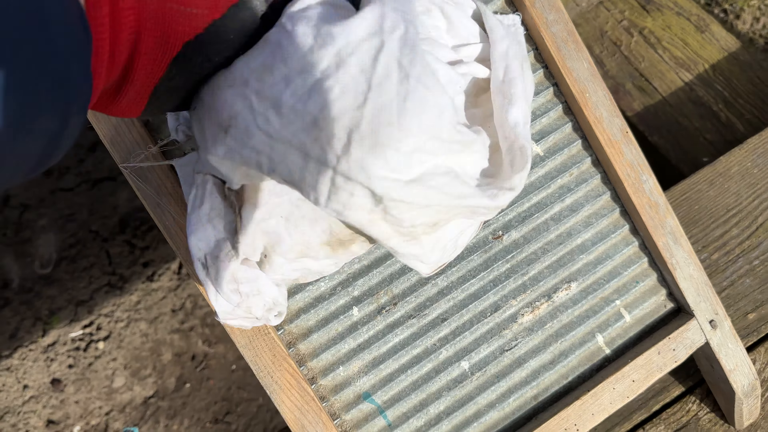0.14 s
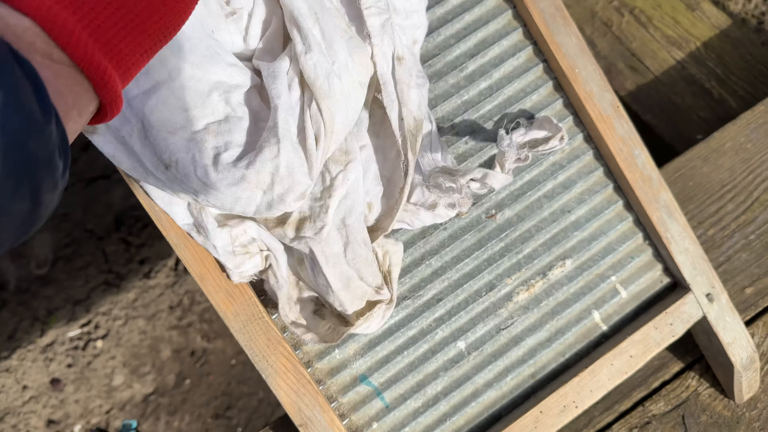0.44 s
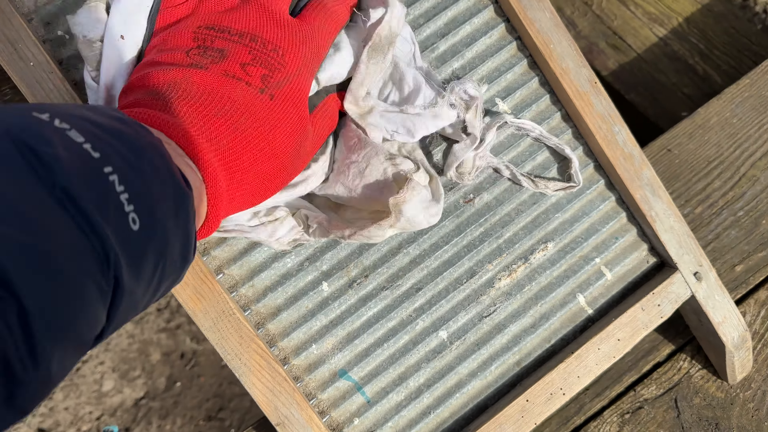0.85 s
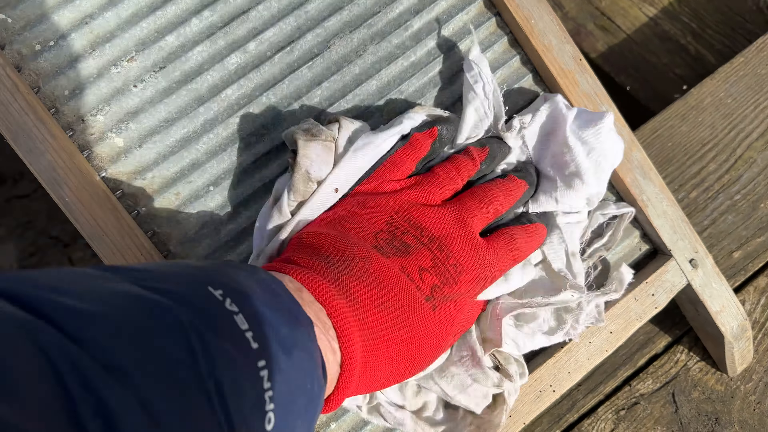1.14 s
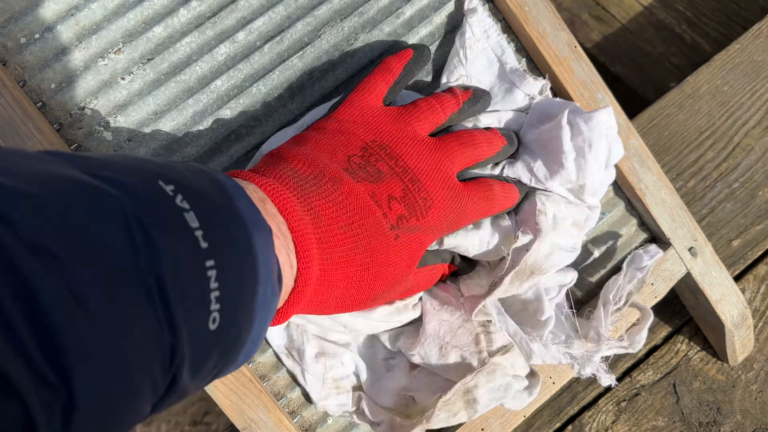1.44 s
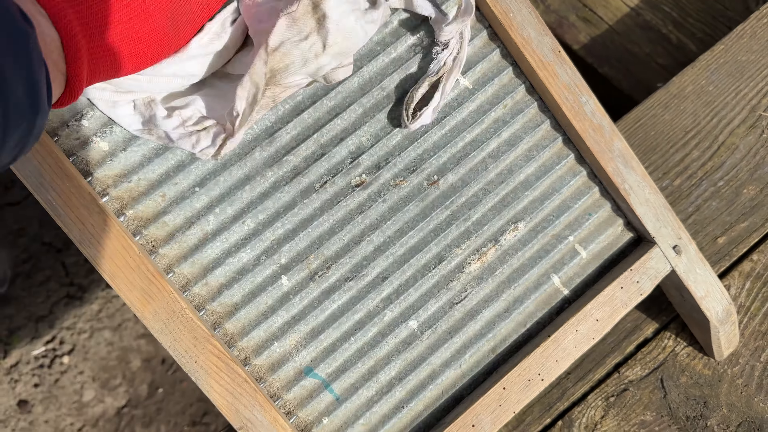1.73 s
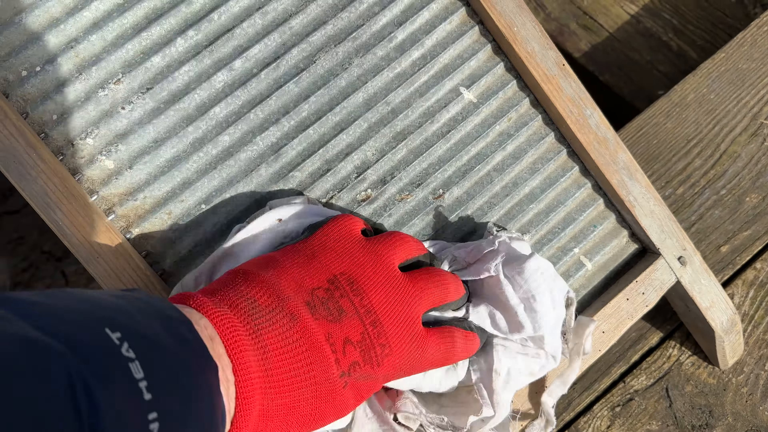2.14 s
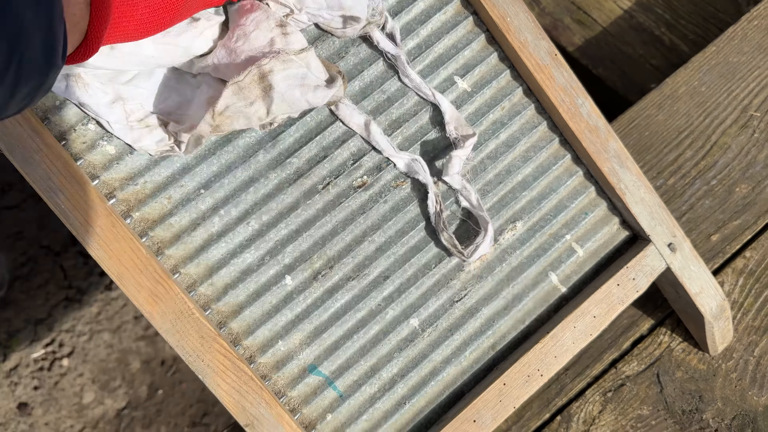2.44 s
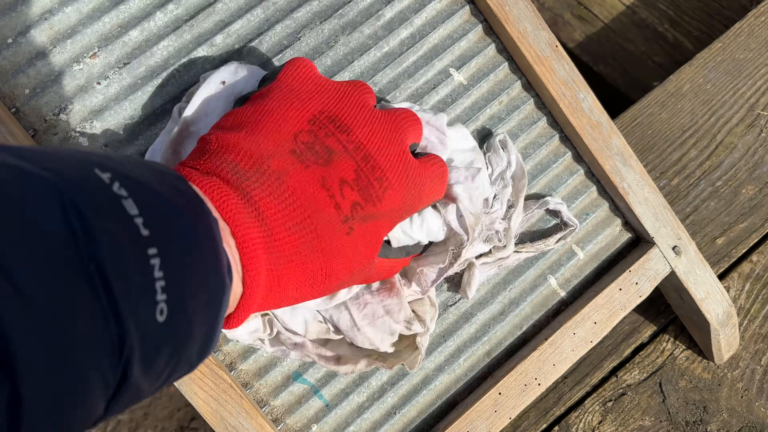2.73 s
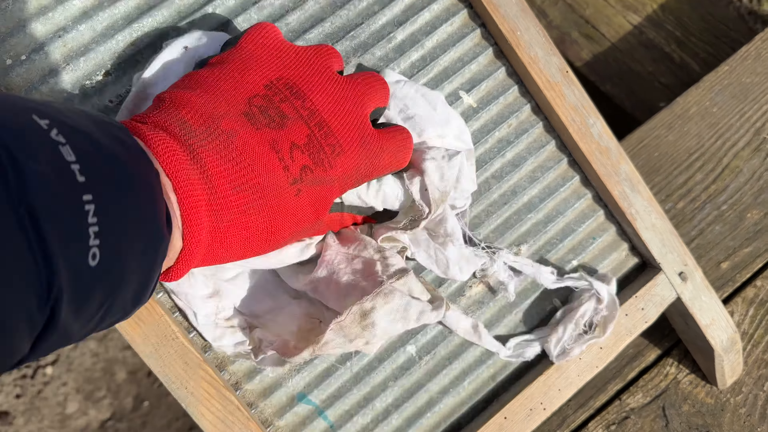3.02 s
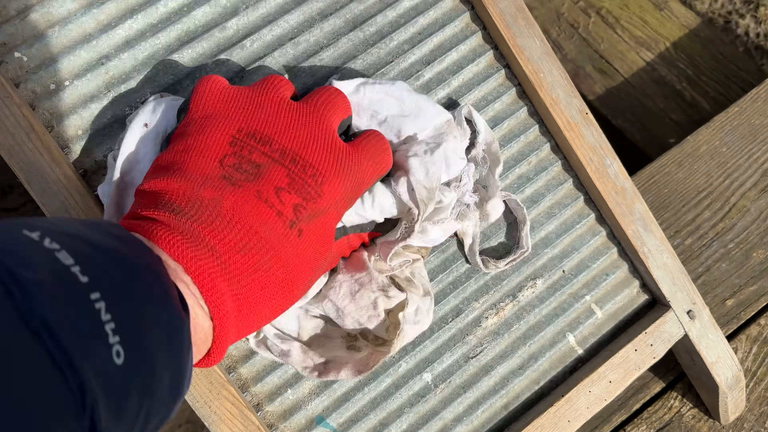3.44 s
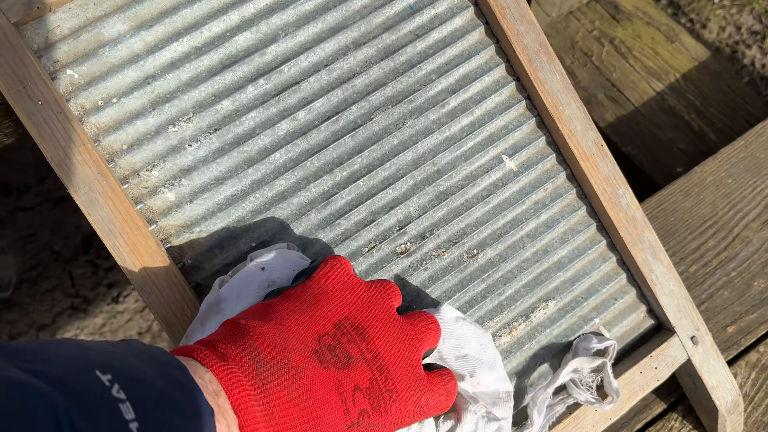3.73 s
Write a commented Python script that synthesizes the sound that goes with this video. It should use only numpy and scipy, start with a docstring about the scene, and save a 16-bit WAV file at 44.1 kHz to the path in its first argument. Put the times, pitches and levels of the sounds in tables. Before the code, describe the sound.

Wet fabric rubs a ribbed metal board in a wooden frame: first a rattling landing, then one slow stroke and six quicker ones with hollow drumming and knocks, close and dry in quiet open air.

```python
"""Close by, outdoors, with no echo: a wet cloth lands on a corrugated metal washboard in a wooden frame.
The board clatters; a hand then scrubs the cloth down and up in seven strokes.
The fabric is noise that hisses with the hand's speed; slips over the ribs tick and some folds rasp.
Under pressure the slips drum the sheet and boom in the frame's modes, with knocks, thumps and wet slaps.
Quiet air noise lies behind."""
import sys
import numpy as np
from scipy import signal
from scipy.fft import rfft, irfft
from scipy.io import wavfile
from scipy.ndimage import uniform_filter1d

SR = 44100
rng = np.random.default_rng(int(sys.argv[2]) if len(sys.argv) > 2 else 0)


def generate_wav(signal):
    """Clip the signal to [-1, 1] and save it as 16-bit WAV at the path in sys.argv[1]."""
    frames = np.transpose(np.atleast_2d(signal))
    scaled = np.clip(frames, -1, 1) * 32767
    pcm = np.round(scaled).astype(np.int16)
    wavfile.write(sys.argv[1], SR, pcm)


N = 169785


def undb(db):
    """Level: decibels to amplitude gain."""
    return 10 ** (np.asarray(db) / 20)


def unit(x):
    """Normalisation: scale to rms 1."""
    return x / np.sqrt(np.mean(x ** 2))


def noise(size=N):
    """White noise: equal mean power at every frequency."""
    return rng.standard_normal(size)


def through(x, response):
    """Convolution: pass a signal through an impulse response."""
    return signal.fftconvolve(x, response)[:len(x)]


def energy_one(h):
    """Normalisation: scale a response to unit energy."""
    return h / np.sqrt(np.sum(h ** 2))


def colour(x, points, size=4096):
    """Minimum-phase filtering: a causal response of given spectrum; white noise keeps its level."""
    hz, db = np.array(points).T
    freq = np.maximum(np.arange(size // 2 + 1) * SR / size, 1)
    magnitude = undb(np.interp(np.log(freq), np.log(hz), db))
    cepstrum = irfft(np.log(magnitude))
    # folding the cepstrum onto positive time makes the filter causal
    cepstrum[1:size // 2] *= 2
    cepstrum[size // 2 + 1:] = 0
    return through(x, energy_one(irfft(np.exp(rfft(cepstrum)))))


def ring(modes, t, left=1):
    """Modal superposition: decaying sines of alternating sign; damping leaves a share of each t60."""
    total = np.zeros(len(t))
    for k, (hz, db, t60) in enumerate(modes):
        decay = np.exp(-np.log(1000) * t / (t60 * left))
        total += (-1) ** k * undb(db) * np.sin(2 * np.pi * hz * t) * decay
    return energy_one(total)


def add(out, start, sound):
    """Superposition: mix a sound in at a time."""
    i = max(int(start * SR), 0)
    out[i:i + len(sound)] += sound[:N - i]


# spectrum of the fabric's hiss: (f/Hz, relative level/dB per Hz)
FABRIC_SPECTRUM = [(100, 9.5), (500, -2), (1500, 3), (3000, 1.5), (5000, 1), (7500, -1.5), (9800, 1.5),
                   (11200, -11.5), (13500, -3.5), (16000, -3)]
# spectrum of the ticks over the ribs: (f/Hz, relative level/dB per Hz)
TICK_SPECTRUM = [(100, -11), (400, 8.5), (900, 1.5), (2300, 1), (4000, -1), (12000, -29.5)]
# spectrum of the sheet as the slips drum it: (f/Hz, relative level/dB per Hz)
DRUM_SPECTRUM = [(150, -19), (280, -6), (420, -4.5), (700, 3.5), (1100, 3.5), (1400, -9), (1800, -10.5),
                 (3800, -17), (7000, -69)]
TICK_PULSING, DRUM_PULSING = 0.68, 0.22  # share of the rubbing that comes in bursts
FABRIC_DB, TICKS_DB, SHEET_DB, BOOM_DB = 4, -6, -2.5, -3


def scrubbing(t, fibre_db=2.0, hand_left=0.35, ring_db=-3, uneven_db=3.0):
    """Friction excitation: fibres hiss, ribs tick, folds rasp; slips shake the damped sheet and the frame."""
    pace, rate, hiss, tick = motion(t)
    on_sheet, on_frame = pressure(t, pace)
    slips = rib_slips(t, rate)
    short = t[:SR // 2]

    fibres = unit(noise() * undb(fibre_db * noise()))  # uneven grain
    fabric = undb(FABRIC_DB) * colour(fibres * hiss, FABRIC_SPECTRUM)
    ticks = undb(TICKS_DB) * colour(rubbing(slips, TICK_PULSING) * tick, TICK_SPECTRUM)

    ringing = through(rubbing(slips, DRUM_PULSING), sheet(short, hand_left))
    shaken = unit(rubbing(slips, DRUM_PULSING) + undb(ring_db) * ringing)
    drum = undb(SHEET_DB) * unit(colour(shaken, DRUM_SPECTRUM)) * on_sheet

    boom = undb(BOOM_DB) * frame_boom(slips, short) * on_frame
    folds = rasps(t, rubbing(slips, DRUM_PULSING))
    return uneven(fabric + ticks, uneven_db) + drum + folds + boom


# strokes of the hand, down and up in turn; levels are before the layer gains:
# (start t/s, fastest t/s, end t/s, top speed/ribs per s, hiss level/dB, tick level/dB)
STROKES = [(0.758, 1.18, 1.308, 50.5, -49, -56), (1.351, 1.5, 1.728, 80.5, -47.5, -70),
           (1.725, 1.978, 2.212, 86.4, -48, -47), (2.164, 2.253, 2.515, 78.7, -48.5, -45.5),
           (2.554, 2.713, 2.895, 79.3, -47, -45.5), (2.936, 3.028, 3.277, 80, -47, -44.5),
           (3.27, 3.501, 3.624, 71.7, -46.5, -39.5)]
HISS_LAW, TICK_LAW = 0.82, 1  # strength as a power of speed
STOP_LAW = 0.75  # below 1 the hand keeps its speed longer and stops more abruptly


def motion(t):
    """Kinematics: each stroke speeds up and slows; gives speed 0-1, ribs per s, hiss and tick strength."""
    pace, rate, hiss, tick = np.zeros((4, N))
    for start, fastest, end, top, hiss_db, tick_db in STROKES:
        speed = np.sin(np.pi / 2 * np.interp(t, [start, fastest, end], [0, 1, 0]))
        speed = np.where(t > fastest, speed ** STOP_LAW, speed)
        pace = np.maximum(pace, speed)
        rate = np.maximum(rate, top * speed)
        hiss = np.hypot(hiss, undb(hiss_db) * speed ** HISS_LAW)
        tick = np.hypot(tick, undb(tick_db) * speed ** TICK_LAW)
    return pace, rate, hiss, tick


RIB_SLIP_S, RIB_JITTER, RIB_SCATTER_DB = 0.00069, 0.065, 4  # burst decay, jitter in ribs, size spread


def rib_slips(t, rate, count=400):
    """Stick-slip: the cloth catches on each rib and slips off it in a short, uneven burst."""
    late, size = rng.standard_normal((count, 2)).T
    ribs_passed = np.cumsum(rate) / SR
    at = np.searchsorted(ribs_passed, np.arange(1, count + 1) + RIB_JITTER * late)
    reached = at < N
    hits = np.zeros(N)
    hits[at[reached]] = undb(RIB_SCATTER_DB * np.clip(size, -2, 2))[reached]
    return unit(through(hits, np.exp(-t[:SR // 10] / RIB_SLIP_S)))


def rubbing(slips, pulsing):
    """Amplitude modulation: friction noise, partly steady and partly in bursts at the ribs."""
    return unit(noise() * (1 - pulsing + pulsing * slips))


# the hand leans on the board once or twice in a stroke; levels are before the layer gains:
# (centre t/s, half length t/s, sheet level/dB, frame boom level/dB)
LEANS = [(1.204, 0.11, -61, -43), (1.607, 0.048, -31.5, -34), (2.032, 0.04, -50, -40),
         (2.294, 0.022, -45, -40.5), (2.434, 0.04, -33, -34.5), (2.686, 0.026, -28.5, -30),
         (2.802, 0.036, -52, -40), (3.114, 0.045, -34.5, -36.5), (3.488, 0.045, -33, -30.5)]
GLIDE_SHEET_DB, GLIDE_BOOM_DB = -50.5, -52.5  # light contact all through a stroke, before layer gains
BOOM_LAG_S, BOOM_SPREAD = 0.0026, 1.14  # the frame answers later and longer than the sheet


def swell(u):
    """Smooth pulse: a hyperbolic secant that rises and falls alike."""
    return 1 / np.cosh(np.clip(u, -20, 20))


def pressure(t, pace):
    """Contact force: sheet and frame are driven by light contact and a swell wherever the hand leans."""
    on_sheet = undb(GLIDE_SHEET_DB) * pace
    on_frame = undb(GLIDE_BOOM_DB) * np.sqrt(pace)
    for when, half, sheet_db, boom_db in LEANS:
        sheet_swell = swell((t - when) / half)
        frame_swell = swell((t - when - BOOM_LAG_S) / (half * BOOM_SPREAD))
        on_sheet = np.hypot(on_sheet, undb(sheet_db) * sheet_swell * np.sqrt(pace))
        on_frame = np.hypot(on_frame, undb(boom_db) * frame_swell)
    return on_sheet, on_frame


def uneven(x, depth_db, size=1024, count=3):
    """Time-varying filtering: random gains, smoothed over pitch and time, make the hiss and ticks uneven."""
    spectra = signal.stft(x, nperseg=size)[2]
    over_pitch = uniform_filter1d(noise(spectra.shape), count, axis=0)
    smoothed = unit(uniform_filter1d(over_pitch, count, axis=1))
    gains = unit(undb(depth_db * smoothed))
    return signal.istft(spectra * gains, nperseg=size)[1][:N]


# taut folds that rasp over the ribs: (start t/s, end t/s, level/dB, first f/Hz, last f/Hz)
RASPS = [(0.802, .855, -54, 2500, 2600), (1.072, 1.305, -49.5, 850, 1296), (1.746, 1.87, -53.5, 3180, 2600),
         (1.981, 2.136, -51, 2383, 2193), (2.78, 2.888, -49, 992, 1326), (2.985, 3.089, -47.5, 2230, 1870),
         (3.609, 3.651, -46.5, 2050, 1570)]


def rasps(t, grain, width_hz=330):
    """Gliding resonance: a fold rasps in a narrow band that moves as it tightens or slackens."""
    out = np.zeros(N)
    narrow = signal.butter(2, width_hz, fs=SR, output="sos")
    for start, end, db, first_hz, last_hz in RASPS:
        along = np.interp(t, [start, end], [0, 1])
        centre_hz = first_hz + (last_hz - first_hz) * along
        turn = np.exp(2j * np.pi * np.cumsum(centre_hz) / SR)
        # shift the band to zero, low-pass it and shift it back
        band = unit((signal.sosfilt(narrow, grain / turn) * turn).real)
        out += undb(db) * np.sqrt(np.sin(np.pi * along)) * band
    return out


# modes of the metal sheet, undamped by the hand: (f/Hz, relative level/dB, t60 t/s)
SHEET_MODES = [(337, 2, 0.14), (381, 5, 0.18), (457, 1.5, 0.15), (503, -1, 0.31), (569, 3, 0.23),
               (609, -2, 0.32), (645, -0.5, 0.31), (745, 2.5, 0.14), (926, -3, 0.19), (1101, -5, 0.16),
               (1200, -8, 0.25), (1325, -4.5, 0.083), (1677, 3, 0.19), (1810, 2.5, 0.11), (2640, 6, 0.07),
               (2860, 0.5, 0.11), (3370, -4.5, 0.15), (3735, 3, 0.21)]


def sheet(t, left, dense_t60_s=0.49, modes_db=-2, crack_db=-3, crack_s=0.0014):
    """Impulse response: the sheet answers with a crack, its main modes and a dense wash of lesser ones."""
    dense = energy_one(noise(len(t)) * np.exp(-np.log(1000) * t / (dense_t60_s * left)))
    crack = energy_one(noise(len(t)) * np.exp(-t / crack_s))
    modes = ring(SHEET_MODES, t, left)
    return energy_one(dense + undb(crack_db) * crack + undb(modes_db) * modes)


# modes of the frame, undamped by the hand: (f/Hz, relative level/dB, t60 t/s)
FRAME_MODES = [(65.5, -1.5, 0.092), (128.5, 1, 0.11), (166, 0, 0.064), (193.2, 0, 0.08), (265, -9, 0.037)]


def frame_boom(slips, short, rumble_db=-2):
    """Forced resonance: the rib slips and a steady rumble drive the frame's modes."""
    response = ring(FRAME_MODES, short)
    slipping = unit(through(slips - np.mean(slips), response))
    rumble = unit(through(noise(), response))
    return unit(slipping + undb(rumble_db) * rumble)


# sharp knocks of the board, from landing or from a hard catch of the cloth:
# (t/s, relative level/dB, contact time t/s, ring left by the hand 0-1)
KNOCKS = [(0.233, -36.5, 0.0018, 1), (0.3029, -22.5, 0.00059, 0.27), (0.309, -33, 0.000025, 0.46),
          (.319, -23.5, 0.00039, 0.08), (.325, -26, 0.000039, 0.37), (.331, -24, 0.000077, 0.39),
          (.349, -28.5, 0.00011, 0.28), (.36, -30, 0.00042, 0.75), (.541, -48.5, 0.00011, 1),
          (1.555, -34, 0.000036, 0.72), (1.62, -41, 0.00023, 0), (1.96, -40, 0.00029, 0.2),
          (2.37, -29.5, 0.00015, 0.28), (2.638, -31, 0.00022, 0.22), (2.654, -29, 0.00012, 0.34),
          (2.671, -28, 0.0001, 0.6), (2.684, -31.5, 0.000097, 0.35), (2.938, -49, 0.00011, 0.08),
          (2.992, -39, 0.00012, 0.12), (3.023, -42, 0.000089, 0.3), (3.462, -31, 0.00006, 0.6),
          (3.477, -32.5, 0.000069, 0.19), (3.49, -31.5, 0.000046, 0.32)]
# spectrum of the clang: (f/Hz, relative level/dB per Hz)
CLANG_SPECTRUM = [(130, -5), (340, 0), (480, -1), (900, 8.5), (1750, 9.5), (2150, 10), (2800, 10),
                  (3800, 11), (6000, 9), (9500, 7.5), (11500, -1), (16000, 7)]


def knocks(t, knock_db=26):
    """Impact excitation: the board is jolted; longer, softer contact gives a duller clang."""
    out, short = np.zeros(N), t[:SR // 2]
    for start, db, contact, left in KNOCKS:
        answer = colour(sheet(short, max(left, 0.05)), CLANG_SPECTRUM)
        push = short * np.exp(-short / contact)
        add(out, start, undb(db + knock_db) * energy_one(through(answer, push)))
    return out


# soft blows of the hand and the bundle: (t/s, relative level/dB, push length t/s)
THUMPS = [(0.2, -39, 0.0088), (.230, -33, 0.0047), (0.247, -26, 0.00074), (.260, -31, 0.0027),
          (0.283, -34.5, 0.00071), (0.649, -46.5, 0.012), (.833, -42, 0.0054), (1.273, -40.5, 0.0058),
          (1.354, -39.5, 0.0066), (1.434, -29, 0.00045), (1.453, -33.5, 0.0027), (2.37, -34, 0.00077),
          (2.945, -40, 0.01), (3.646, -35, 0.0069), (3.667, -36, 0.0058), (3.735, -34, 0.0034)]


def thumps(t, thump_db=27, left=0.49):
    """Low-pass impact: padded half-sine blows move only the frame."""
    out, short = np.zeros(N), t[:SR // 2]
    for start, db, length in THUMPS:
        push = np.sin(np.pi * np.minimum(short / length, 1))
        boom = through(ring(FRAME_MODES, short, left), push)
        add(out, start, undb(db + thump_db) * energy_one(boom))
    return out


# wet slaps, slides and snaps of the fabric:
# (start t/s, relative level/dB, rise t/s, decay t/s, dull above f/Hz)
SLAPS = [(0, -47, 0.11, 0.06, 18000), (.17, -50, 0.15, 0.022, 12000), (0.324, -39.5, 0.0014, 0.017, 18000),
         (.68, -52.5, 0.071, 0.022, 12000), (0.817, -42, 0.0043, 0.022, 7360),
         (1.7375, -33.5, 0.00064, 0.02, 9900), (1.77, -39.5, 0.015, 0.036, 6000),
         (1.845, -33, 0.00059, 0.0019, 7050), (3.583, -28.5, 0.00065, 0.0081, 4400),
         (3.614, -34.5, 0.027, 0.0063, 2590), (3.72, -55, .06, 0.043, 10800)]
# spectrum shared by the slaps: (f/Hz, relative level/dB per Hz)
SLAP_SPECTRUM = [(200, 0.5), (1500, -8), (2800, -3), (5000, -5), (9500, -3), (11500, -12), (16000, -7.5)]


def slaps(t, crackle_db=3):
    """Transient noise: folds of wet fabric land, slide or snap on the metal in crackling bursts."""
    out = np.zeros(N)
    for start, db, rise, decay, dull_hz in SLAPS:
        attack = np.clip((t - start) / rise, 0, 1)
        fade = np.exp(-np.maximum(t - start - rise, 0) / decay)
        crackle = unit(noise() * undb(crackle_db * noise()))
        dull = signal.butter(2, dull_hz, fs=SR, output="sos")
        out += undb(db) * signal.sosfilt(dull, attack * fade * crackle)
    return colour(out, SLAP_SPECTRUM)


# spectrum of the outdoor air: (f/Hz, relative level/dB per Hz)
AIR_SPECTRUM = [(30, -17), (70, 5.5), (130, -3), (330, -10.5), (1500, -11.5), (3000, -17), (9500, -20.5),
                (11300, -30), (16000, -27)]


def air(level_db=-55):
    """Stationary background: quiet outdoor air as steady coloured noise."""
    return undb(level_db) * colour(noise(), AIR_SPECTRUM)


def scene():
    """Superposition: the washboard's layers over quiet outdoor air."""
    t = np.arange(N) / SR
    return (scrubbing(t) + knocks(t) + thumps(t) + slaps(t) + air())[None]


def record(dry, low_cut_hz=50, top_hz=15800):
    """Band limiting: the recorder drops the deep bass and cuts the top."""
    high_pass = signal.butter(5, low_cut_hz, "high", fs=SR, output="sos")
    low_pass = signal.ellip(10, 0.2, 70, top_hz, fs=SR, output="sos")
    return signal.sosfilt(low_pass, signal.sosfilt(high_pass, dry))


dry = scene()
out = record(dry)
generate_wav(out)
```